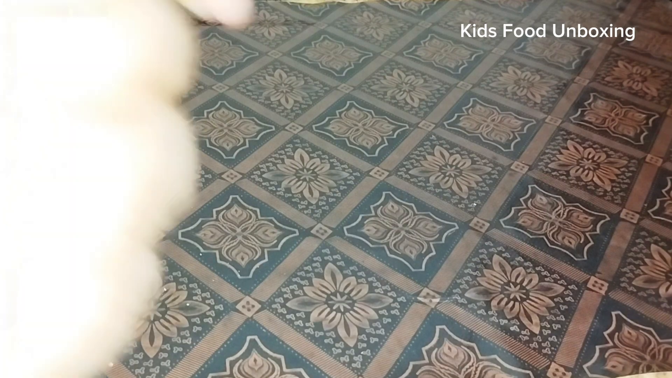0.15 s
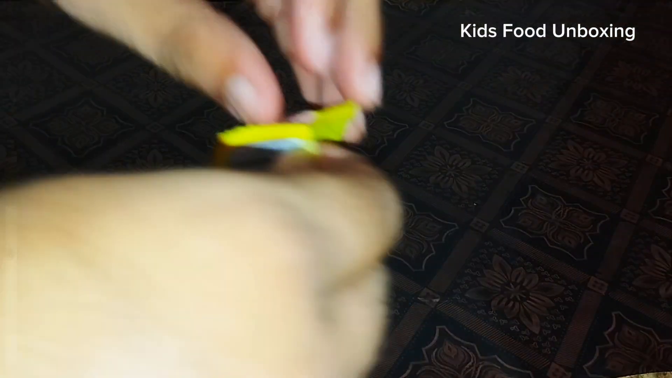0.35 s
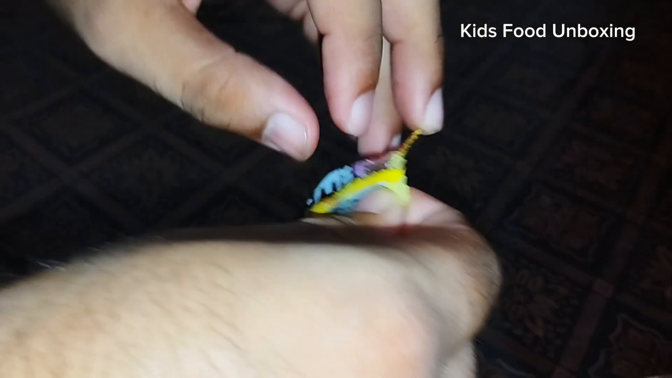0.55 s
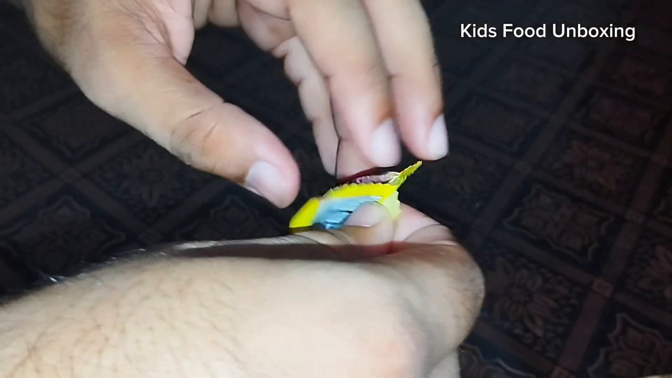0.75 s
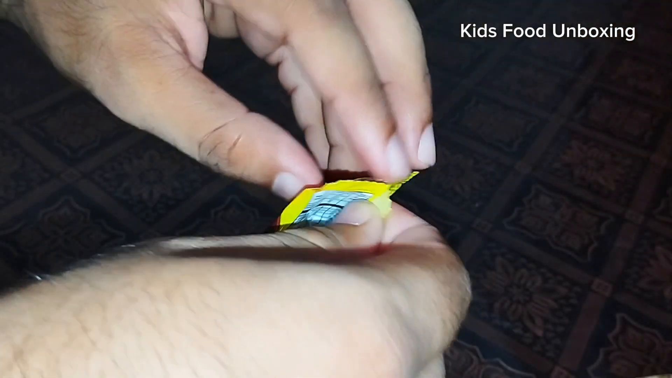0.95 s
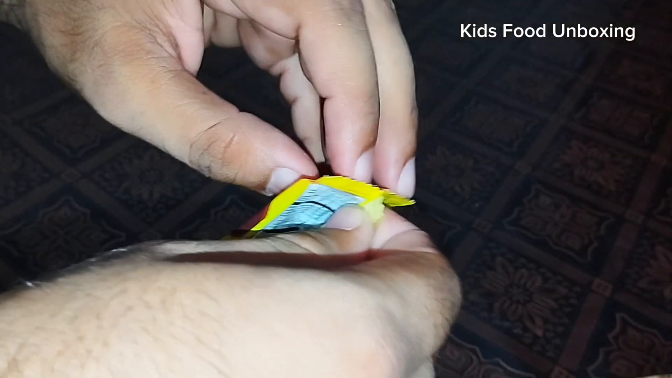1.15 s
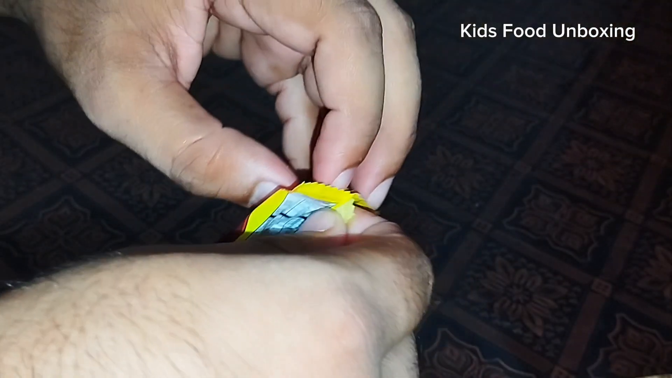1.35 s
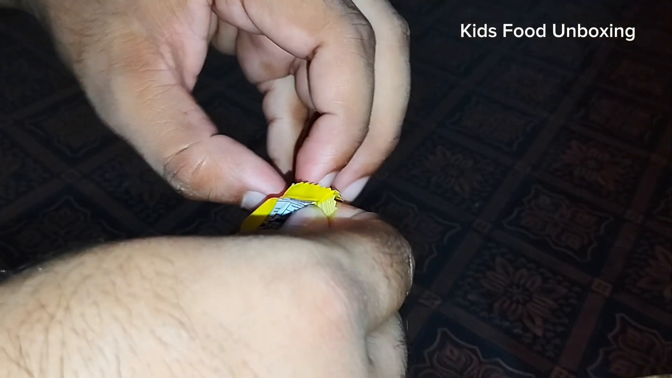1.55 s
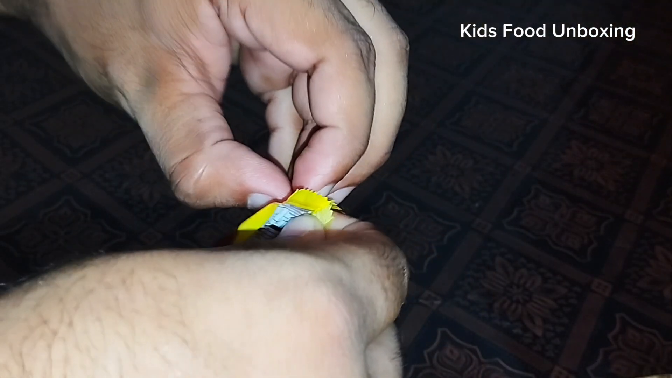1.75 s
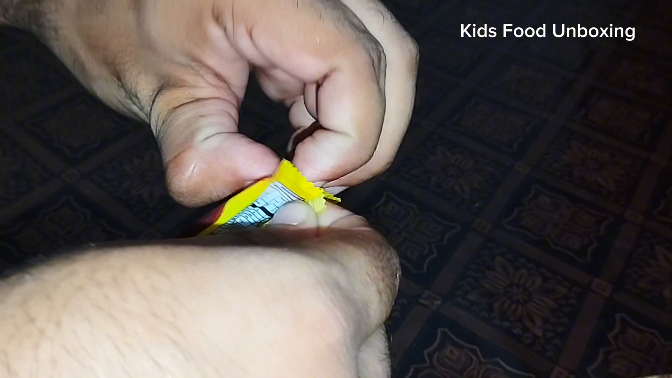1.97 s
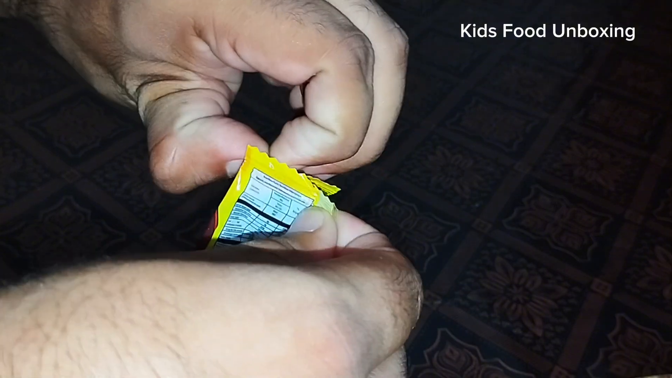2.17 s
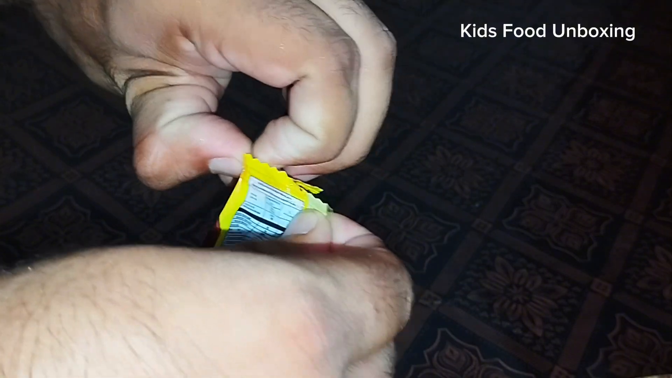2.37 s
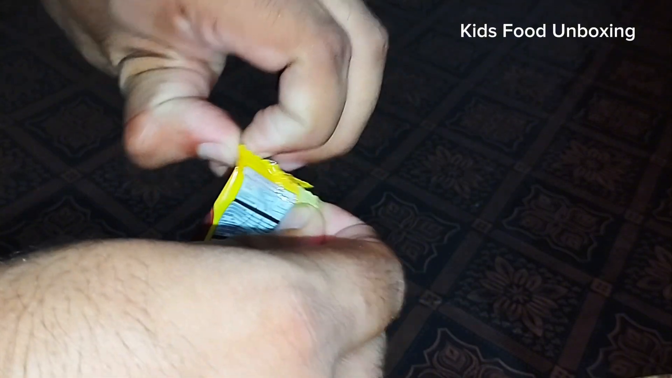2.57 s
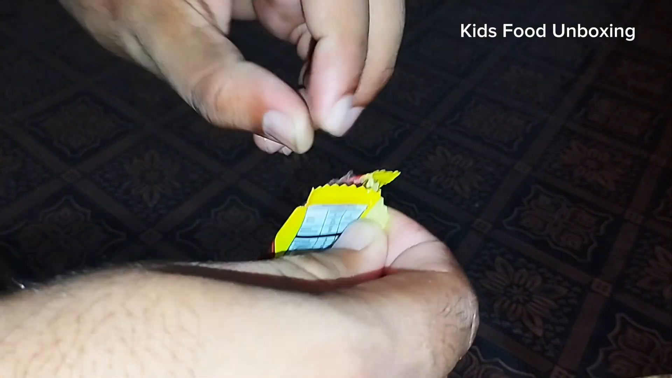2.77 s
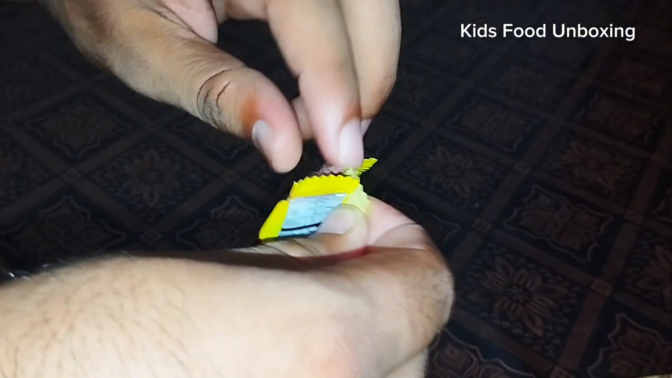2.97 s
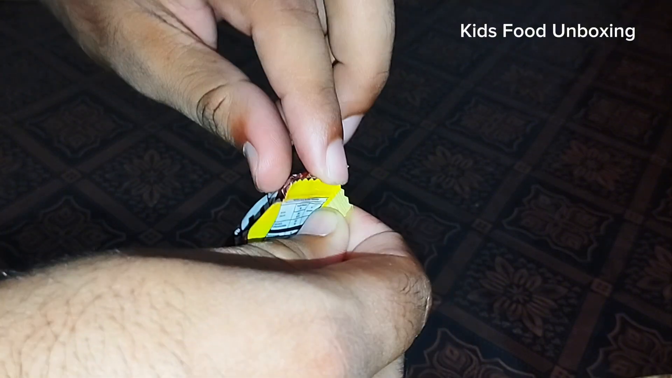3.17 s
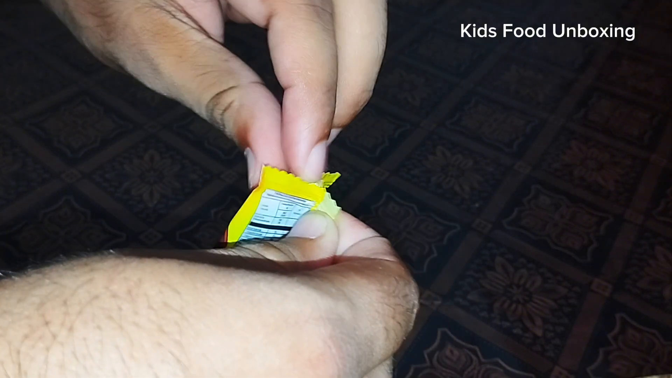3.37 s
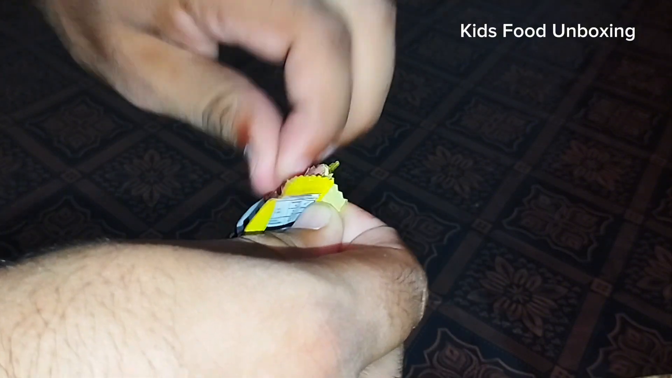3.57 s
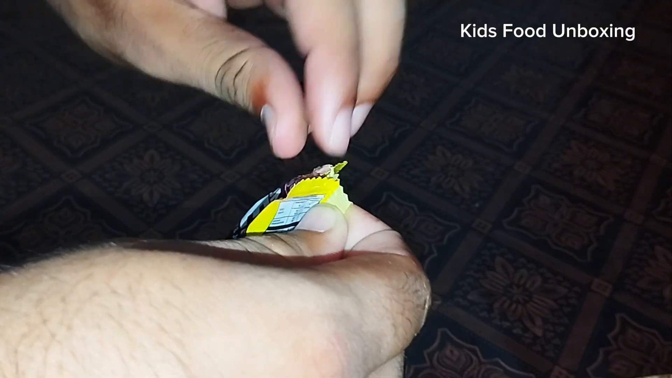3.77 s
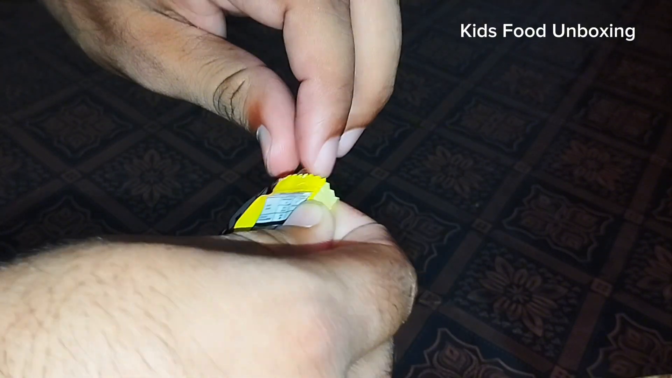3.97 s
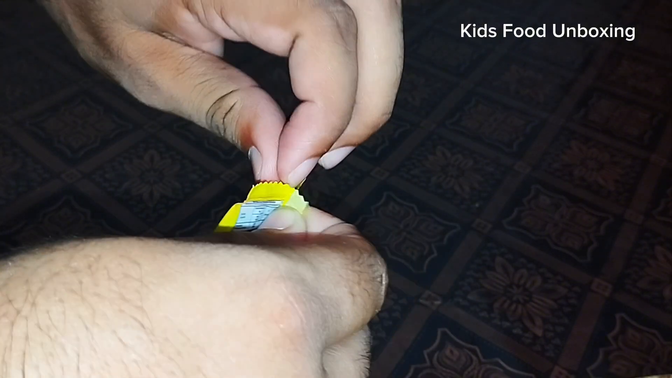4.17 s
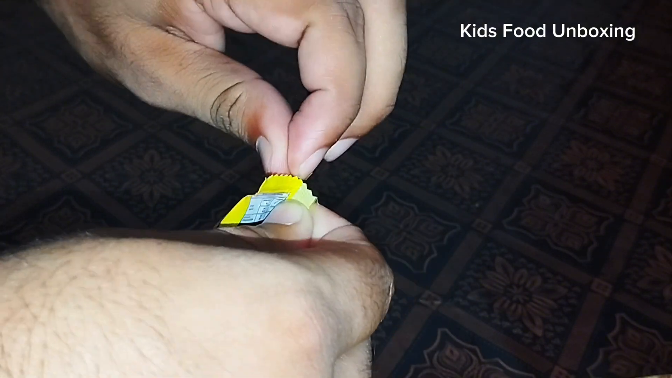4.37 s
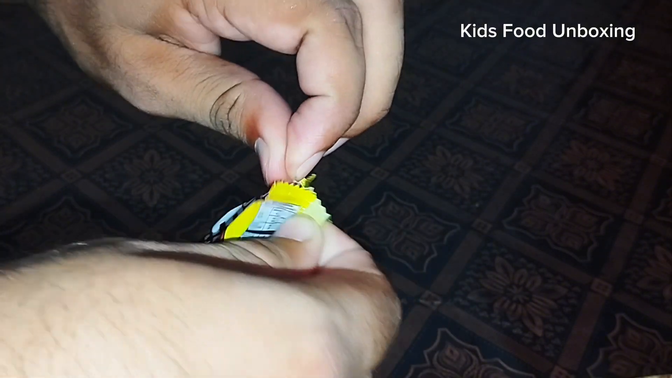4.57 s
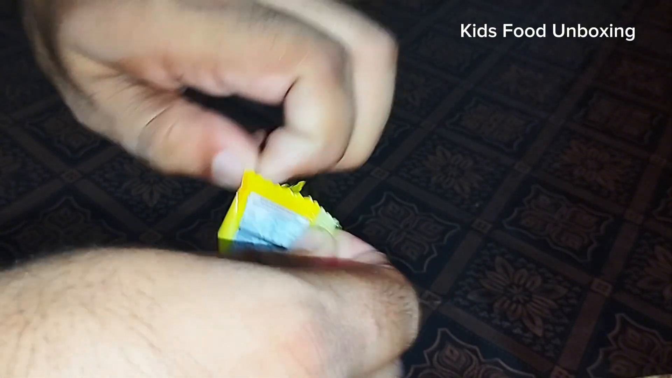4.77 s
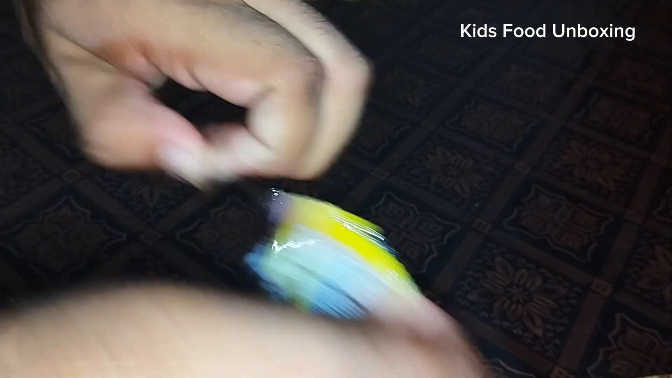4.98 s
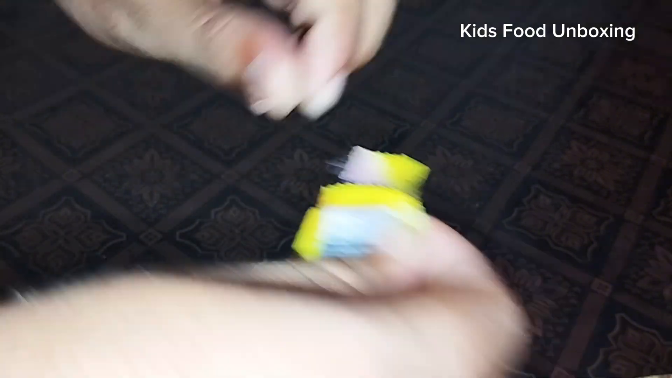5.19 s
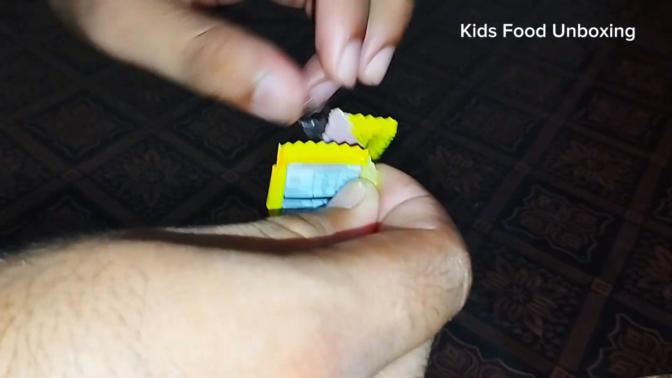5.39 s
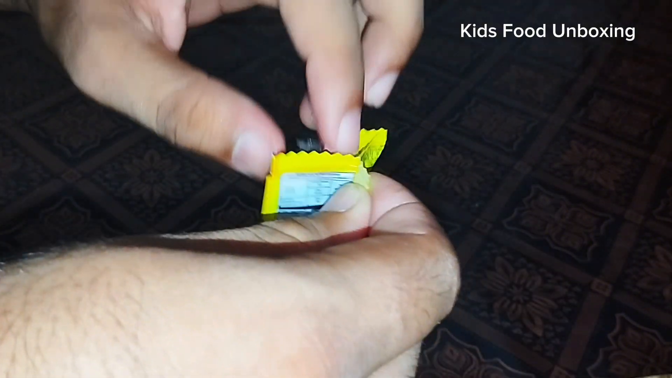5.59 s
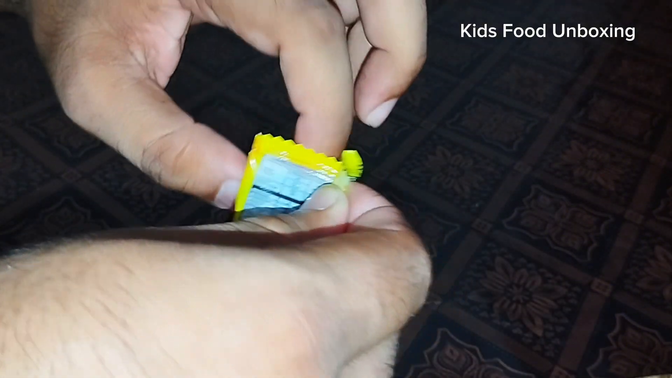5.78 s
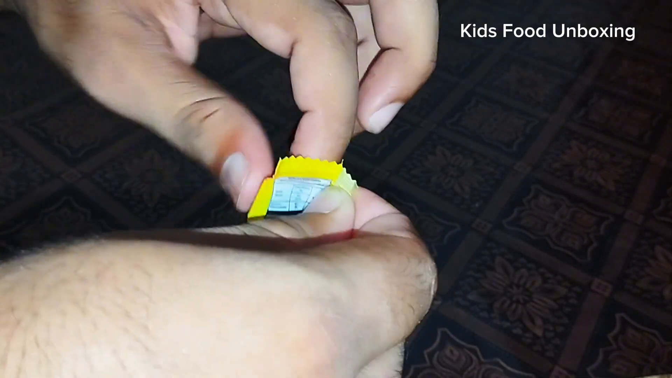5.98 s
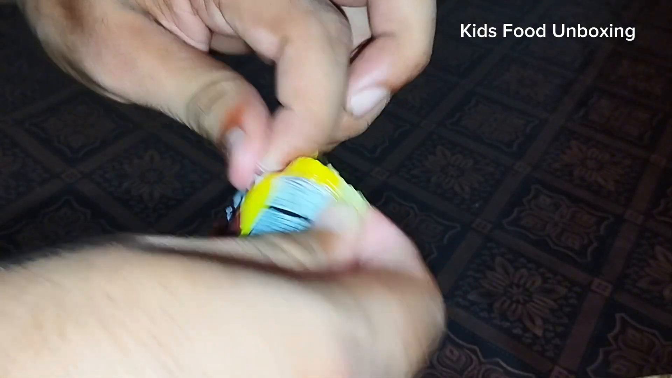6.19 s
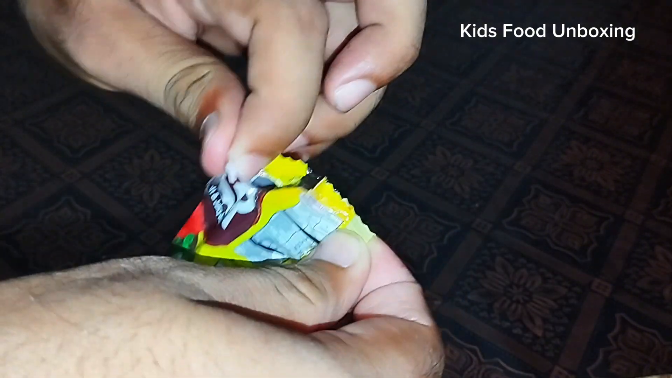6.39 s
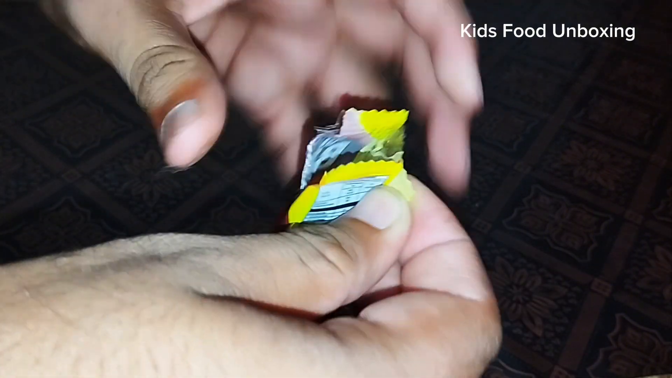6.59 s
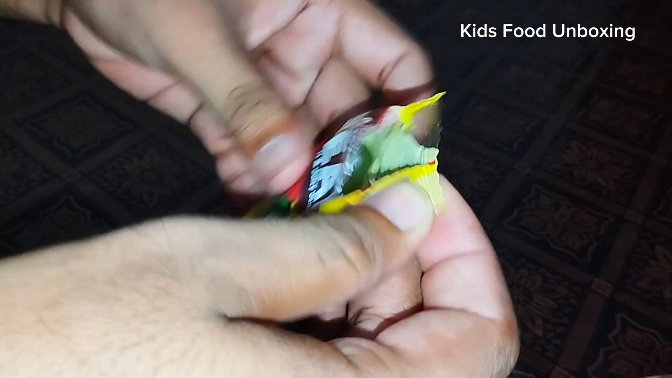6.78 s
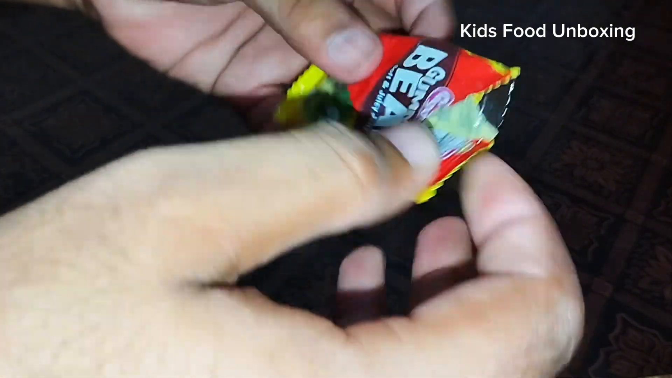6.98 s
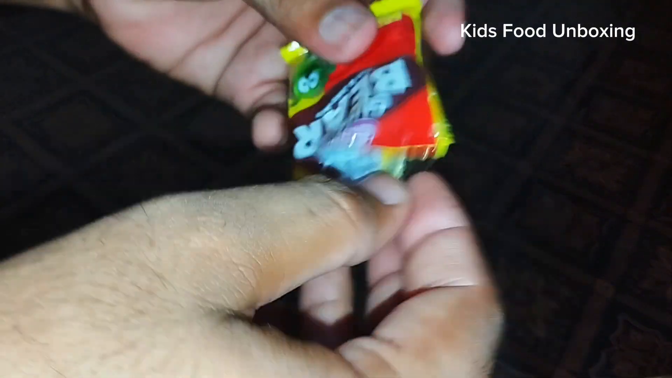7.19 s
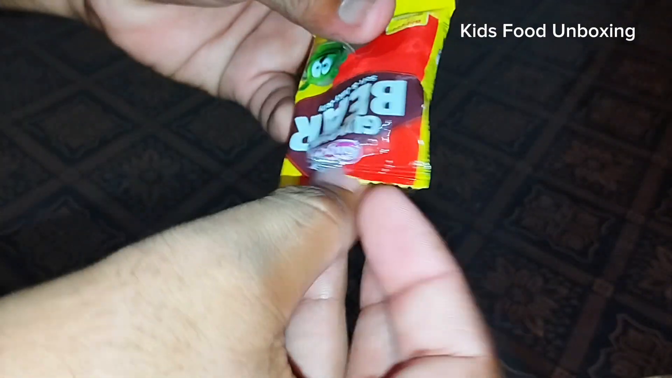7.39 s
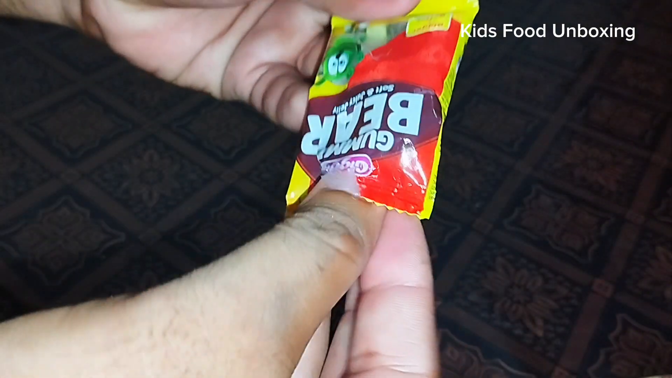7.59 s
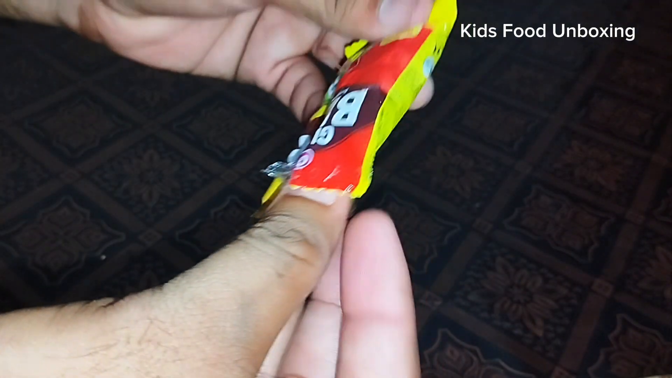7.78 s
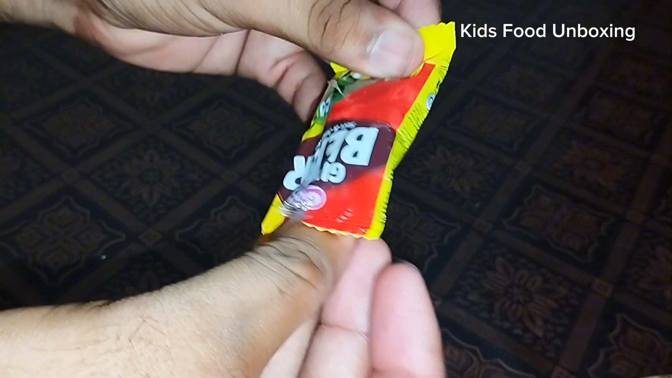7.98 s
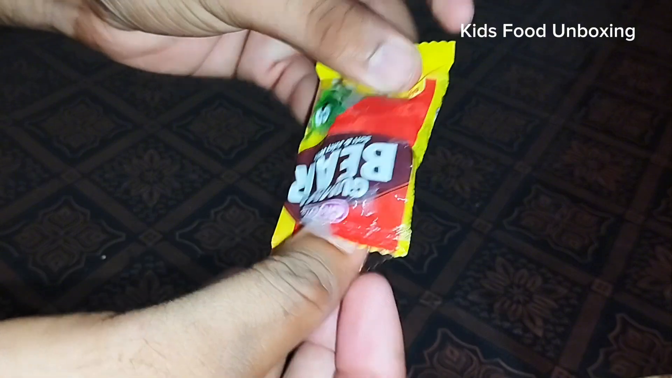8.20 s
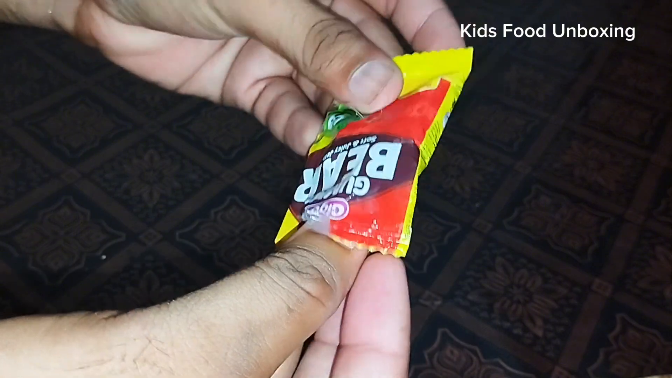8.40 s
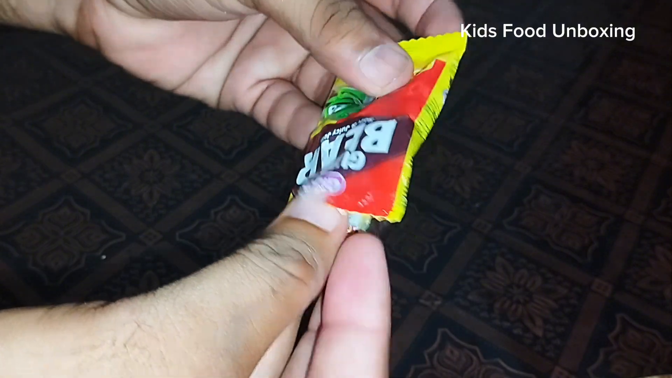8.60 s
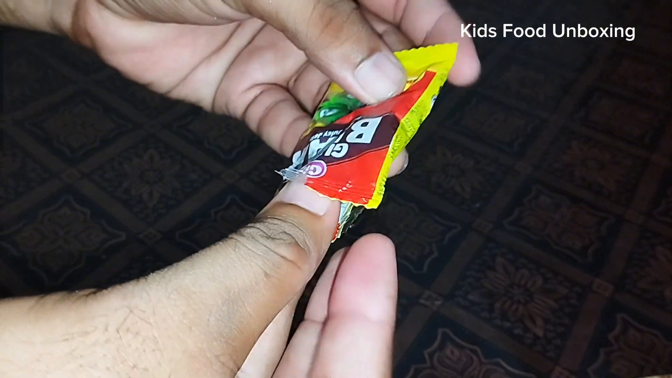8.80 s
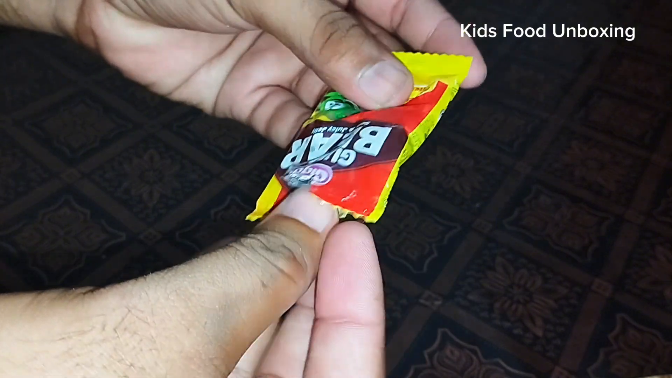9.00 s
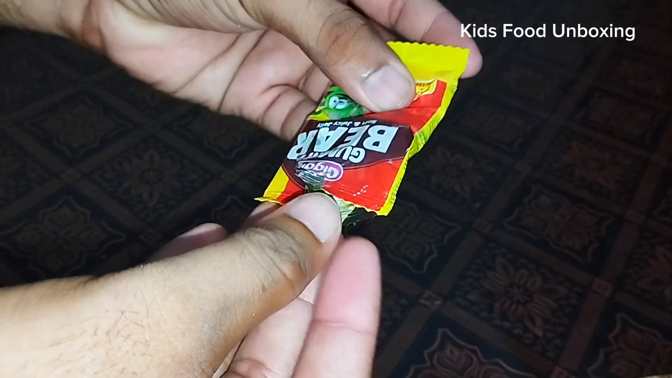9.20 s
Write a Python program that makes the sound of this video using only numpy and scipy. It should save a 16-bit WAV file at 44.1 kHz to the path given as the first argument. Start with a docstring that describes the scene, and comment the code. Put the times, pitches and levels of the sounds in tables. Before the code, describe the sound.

Close, bright crackling of a little plastic packet being pulled open in irregular bursts, with short room reflections and a deep fan-like hum beneath.

```python
"""Sharp snaps and fine crinkling, very close: fingers pick open a small plastic snack wrapper in a hard-walled room.
Creases in the stiff film buckle as filtered impulses with noisy tails; around them come clumps of tiny
ringing ticks, grainy fingertip slides, narrow-band tails and low, damped thuds.
Beneath lies room air, a low fan hum of wandering partials whose level varies, and a distant noise-modulated
drone that swells towards the end."""
import sys
import numpy as np
from scipy import signal
from scipy.fft import rfft, irfft
from scipy.io import wavfile

SR = 44100
rng = np.random.default_rng(int(sys.argv[2]) if len(sys.argv) > 2 else 0)


def store_wav(level_fs):
    """Save 16-bit WAV to argv[1]."""
    pcm = np.round(np.clip(np.atleast_2d(level_fs), -1, 1) * 32767)
    wavfile.write(sys.argv[1], SR, pcm.T.astype(np.int16))


N = 407925
TIME = np.arange(N) / SR


def from_db(db):
    """Decibels to an amplitude factor."""
    return 10 ** (np.asarray(db) / 20)


def rms_one(x):
    """Scale to an RMS of 1, over all channels together."""
    return x / np.sqrt(np.mean(x ** 2) + 1e-20)


def in_time(rows):
    """Each column of a time curve, at every sample."""
    s, *columns = np.transpose(rows)
    return [np.interp(TIME, s, column) for column in columns]


def at_hz(points, hz):
    """A table read on a log-frequency axis."""
    f, value = np.transpose(points)
    return np.interp(np.log(np.maximum(hz, 1)), np.log(f), value)


def resonance(hz, centre, q):
    """Complex response of one damped resonance, 1 at its centre."""
    s = 1j * hz / centre
    return s / q / (s * s + s / q + 1)


def colour(x, spectrum, size=8192):
    """Causal (minimum-phase) filter with the given spectrum."""
    gain = from_db(at_hz(spectrum, np.fft.rfftfreq(size, 1 / SR)))
    cepstrum = irfft(np.log(gain))
    # folding the cepstrum onto positive time makes the phase minimal
    cepstrum[1:size // 2] *= 2
    cepstrum[size // 2 + 1:] = 0
    impulse_response = irfft(np.exp(rfft(cepstrum)))
    return signal.oaconvolve(x, impulse_response[None], axes=1)[:, :N]


def drift(rate):
    """Smooth random wander of spread 1, changing about rate times a second."""
    knots = rng.standard_normal(4096)
    return np.interp(TIME * rate, np.arange(len(knots)), knots) * np.sqrt(3 / 2)


# spectral shape of the room air: (frequency [Hz], relative level per Hz [dB])
AIR_SPECTRUM = [(20, 3.5), (45, -2.5), (190, -8.5), (330, -13), (650, -25), (1500, -30), (5800, -35.5),
                (7100, -27.5), (8200, -41), (16000, -49)]


def air(level_db=-45.0, apart_hz=600, unlike_db=-13):
    """Room rumble and hiss: mostly alike at both ports in the bass, unrelated in the treble."""
    mid, side = rng.standard_normal((2, N))
    highpass = signal.butter(1, apart_hz, "high", fs=SR, output="sos")
    side = from_db(unlike_db) * side + signal.sosfilt(highpass, side)
    stereo = np.array([mid + side, mid - side])
    return from_db(level_db) * rms_one(colour(stereo, AIR_SPECTRUM))


# pitch and loudness of the far drone: (time [s], pitch [Hz], level [dB])
DRONE_CURVE = [(0, 101, -55), (6.0, 101.3, -60.5), (6.35, 121, -46.5), (7.1, 103.2, -48.5),
               (9.25, 102.1, -46.5)]


def drone(unsteady_per_s=28):
    """A far tone made unsteady by random modulation; it jumps up as it swells, then sinks in pitch."""
    pitch, level_db = in_time(DRONE_CURVE)
    tone = np.exp(2j * np.pi * np.cumsum(pitch) / SR)
    wander = drift(unsteady_per_s) + 1j * drift(unsteady_per_s)
    return from_db(level_db) * np.real(wander * tone)


# level of the low hum as heard, dipping briefly after the loud 5.07 s snap:
# (time [s], level before the hum trim [dB])
HUM_LEVEL = [(0.0, -38), (0.28, -33.5), (0.51, -57), (0.74, -30.5), (1.75, -37), (2.55, -33.5), (2.88, -41),
             (3.4, -30), (3.81, -50.5), (4.3, -30), (4.9, -42), (5.12, -64), (5.23, -39.5), (6.18, -45.5),
             (7.24, -37), (8.94, -44), (9.25, -32)]
# loudness of the hum's overtones: (time [s], third partial level [dB], fourth partial level [dB])
HUM_OVERTONES = [(0, -46.5, -45.5), (1.35, -46, -47), (2.3, -59, -64.5), (5.6, -51.5, -58),
                 (9.25, -62, -57)]


def fan(blade_hz=45.24, wobble_hz=0.183, hum_db=-5.0, fifth_db=-13,
        churning=0.19, overtone_churning=0.18, apart=0.11):
    """Blade-rate hum in churning air that differs a little at each port, with overtones of changing level."""
    low_db, = in_time(HUM_LEVEL)
    third_db, fourth_db = in_time(HUM_OVERTONES)
    phase = 2 * np.pi * np.cumsum(blade_hz + wobble_hz * drift(5.9)) / SR

    def partial(depth, order):
        """One multiple of the blade rate, its strength and phase stirred at random."""
        shared = depth * (drift(14) + 1j * drift(6.2))
        opposed = apart * (drift(14) + 1j * drift(14)) * np.array([[1], [-1]])
        tone = np.exp(1j * (order * phase + 2 * np.pi * rng.random()))
        return np.sqrt(2) * np.real((1 + shared + opposed) * tone)

    low_hum = from_db(low_db + hum_db) * partial(churning, order=1)
    third = from_db(third_db) * partial(overtone_churning, order=3)
    fourth = partial(overtone_churning, order=4)
    fifth = from_db(fifth_db) * partial(overtone_churning, order=5)
    return low_hum + third + from_db(fourth_db) * (fourth + fifth)


# how long the hard-walled room holds each band: (frequency [Hz], 60 dB decay time [s])
ROOM_DECAY = [(300, 0.38), (2000, 0.28), (6000, 0.3), (15000, 0.23)]


def room(x, build_s=0.034, first_s=0.0029, early_db=-3, early_s=0.0028, count=9):
    """An early burst off nearby surfaces, then a diffuse tail with its own decay in each band."""
    t = np.arange(int(.8 * SR)) / SR
    edges = np.geomspace(150, 18000, count + 1)
    white = rfft(rng.standard_normal((2, len(t))))
    hz = np.fft.rfftfreq(len(t), 1 / SR)
    tail = 0
    for low, high in zip(edges, edges[1:]):
        band = irfft(white * (hz >= low) * (hz < high), len(t))
        t60 = at_hz(ROOM_DECAY, np.sqrt(low * high))
        tail = tail + band * np.exp(-np.log(1000) * t / t60)
    diffuse = 1 - np.exp(-t / build_s)
    early = from_db(early_db) * np.exp(-t / early_s)
    tail = tail * (t > first_s) * (diffuse + early)
    return signal.oaconvolve(x, tail / np.linalg.norm(tail[0]), axes=1)[:, :N]


# low, dull bodies of the heavier snaps and a few soft thuds: (time [s], starting level [dB], pitch [Hz])
LOW_THUDS = [(1.522, -27, 1010), (2.155, -28.5, 405), (2.229, -22, 910), (2.709, -22.5, 393),
             (4.797, -22, 1100), (5.015, -21.5, 946), (5.622, -27.5, 253), (7.602, -21, 820)]


def thuds(decay_s=0.0045, pitch_spread=0.093):
    """Soft, heavily damped thuds, each the mean of three decaying sines at nearby pitches."""
    out, t = np.zeros(N), np.arange(SR // 10) / SR
    for s, level_db, pitch in LOW_THUDS:
        start = round(s * SR)
        pitches = pitch * np.exp(pitch_spread * np.array([-1, 0, 1]))
        modes = np.sin(2 * np.pi * np.outer(pitches, t))
        out[start:start + len(t)] += from_db(level_db) * modes.mean(axis=0) * np.exp(-t / decay_s)
    return out


# fingertips sliding on the film: (start time [s], length [s], level at mid-swell [dB])
FINGER_SLIDES = [(0.367, 0.16, -47.5), (4.384, 0.096, -48), (5.372, 0.14, -52)]


def slides(grain_per_s=900, grain_db=3.5, centre_hz=3500, centre_q=0.68, lowest_hz=1100):
    """Skin sticks and slips on the film in a short swell of grainy noise."""
    out, hz = np.zeros((2, N + SR)), np.fft.rfftfreq(SR, 1 / SR)
    bass_cut = hz / (hz - 1j * lowest_hz)
    for s, length, level_db in FINGER_SLIDES:
        size, start = int(length * SR), int(s * SR)
        grip = from_db(grain_db * drift(grain_per_s)[:SR])
        grainy = rfft(grip * rng.standard_normal((2, SR)))
        rub = irfft(grainy * resonance(hz, centre_hz, centre_q) * bass_cut)
        swell = np.sin(np.pi * np.arange(size) / size)
        out[:, start:start + size] += from_db(level_db) * rms_one(rub)[:, :size] * swell
    return out[:, :N]


# narrow-band tails lingering at a snap's pitch: (start time [s], starting level [dB], pitch [Hz])
PITCHED_TAILS = [(4.797, -30, 3830), (9.143, -43.5, 4130)]


def pitched_tails(decay_s=0.071, impulses_per_s=700):
    """Sparse random impulses through a resonance at the snap's pitch, dying away as the room holds it."""
    out, hz = np.zeros((2, N + SR)), np.fft.rfftfreq(SR, 1 / SR)
    for s, level_db, pitch in PITCHED_TAILS:
        impulses = (rng.random(SR) < impulses_per_s / SR) * rng.standard_normal((2, SR))
        band_q = (pitch / 2100) ** 2   # higher pitches ring clearer
        band = irfft(rfft(impulses) * resonance(hz, pitch, band_q) ** 2)
        start = round(s * SR)
        out[:, start:start + SR] += from_db(level_db) * rms_one(band) * np.exp(-TIME[:SR] / decay_s)
    return out[:, :N]


# separate pulls and pinches of the film: (start time [s], length [s], relative crinkle level at the start [dB])
FILM_STROKES = [(0, 0.15, -46.5), (1.383, 0.13, -46.5), (1.866, 0.07, -45), (2.141, 0.088, -36.5),
                (3.426, 0.23, -40), (4.57, 0.055, -41.5), (4.789, 0.2, -36), (4.999, 0.23, -42),
                (5.653, 0.74, -45.5), (6.234, 0.26, -42), (6.572, 0.044, -30.5), (6.84, 0.14, -42.5),
                (7.227, 0.3, -47.5), (7.593, 1, -40.5), (8.335, 0.44, -40), (8.911, 0.2, -47)]


def crinkle_level(attack_s=0.018, release_s=0.0092, ease_db_per_s=15,
                  tail_db=-48, tail_s=0.054, tail_follows=0.42):
    """Each stroke takes hold, eases and lets go; a faint crackling tail fades after every snap, like reverberation."""
    power = 0
    for start, length, level_db in FILM_STROKES:
        corners = [0, attack_s, attack_s + length, attack_s + length + release_s]
        grip = np.interp(TIME - start, corners, [0, 1, 1, 0])
        eased_db = level_db - ease_db_per_s * np.clip(TIME - start, 0, 1)   # the film yields
        power = power + (grip * from_db(eased_db)) ** 2
    s, snap_db = np.transpose(CREASE_SNAPS)[:2]
    # the tail grows by only a share of the snap's strength in dB
    start_power = from_db(tail_db + tail_follows * snap_db) ** 2
    tail_starts = np.bincount((np.abs(s) * SR).astype(int), start_power, N)
    tail_power = signal.lfilter([1], [1, -np.exp(-2 / (tail_s * SR))], tail_starts + 1e-18)
    return np.sqrt(power + tail_power)


# spectral shape of skin rubbing on the film: (frequency [Hz], relative level per Hz [dB])
RUB_SPECTRUM = [(200, -10), (900, 7.5), (2000, 0.5), (6500, -19.5), (16000, -1)]


def crinkle(per_s=340, clump_db=6.0, rub_db=-6, grain_q=2.35, size_db=6.5, level_db=0.5, count=12):
    """Tiny ringing ticks of many pitches come in clumps, denser when louder, over the soft rub of skin."""
    level = crinkle_level()
    rate = per_s * np.sqrt(level / level.mean()) * from_db(clump_db * drift(35))
    born = rng.random(N) < rate / SR
    sizes = from_db(np.minimum(size_db * rng.exponential(1, N), 18))
    clicks = born * sizes * rng.choice([-1, 1], N)
    dealt = rng.integers(0, count, N)   # which pitch each click gets
    fade = np.exp(-np.arange(128) / 24)   # in samples
    grains = 0
    for k, pitch in enumerate(np.geomspace(1800, 8500, count)):
        ring = rms_one(rng.standard_normal((2, len(fade))) * fade)
        ticks = signal.oaconvolve((clicks * (dealt == k))[None], ring, axes=1)[:, :N]
        b, a = signal.iirpeak(pitch, grain_q, fs=SR)
        grains = grains + signal.lfilter(b, a, ticks + 1e-18)
    rub = rms_one(colour(rng.standard_normal((2, N)), RUB_SPECTRUM))
    return (rms_one(grains) + from_db(rub_db) * rub) * level * from_db(level_db)


# creases buckling: (time [s], relative energy [dB], crease pitch [Hz])
CREASE_SNAPS = [(0.009, 9, 7500), (0.039, -4.5, 6350), (0.104, -8.5, 6170), (0.1126, 4, 5300),
                (0.5276, -10, 7000), (0.9, -10, 4900), (0.93, -14.5, 4900), (1.041, -11, 5540),
                (1.049, -7, 5760), (1.185, -10.5, 3450), (1.407, -2, 3550), (1.519, -0.5, 5500),
                (1.539, -2, 5200), (1.5835, 4, 5600), (1.633, 2.5, 5250), (1.708, -10.5, 3850),
                (1.7469, -6.5, 6300), (1.83, -12.5, 5430), (1.919, -0.5, 3440), (2.0133, -5, 5740),
                (2.026, -9.5, 5100), (2.091, -5, 5500), (2.1196, 5.5, 5340), (2.1561, 11.5, 6000),
                (2.1867, 6, 5030), (2.196, 2, 5600), (2.221, -11, 6550), (2.2302, 1.5, 3600),
                (2.347, 1, 3440), (2.381, -4.5, 6400), (2.528, -9.5, 3270), (2.5563, -5, 3320),
                (2.6711, 5.5, 5600), (2.678, 3.5, 4000), (2.707, 4, 4140), (2.712, 9, 6450),
                (2.955, -19, 3780), (3.112, -26, 2980), (3.3754, -11, 3550), (3.4211, 1, 7200),
                (3.4325, -6.5, 6040), (3.447, 2, 5740), (3.455, 4, 5750), (3.472, 3.5, 6960),
                (3.5511, 3.5, 5550), (3.5695, 3.5, 4900), (3.5992, -4, 4000), (4.156, -20, 5500),
                (4.19, -24, 4000), (4.261, -16.5, 3680), (4.29, -26, 4000), (4.474, -12.5, 5300),
                (4.51, -12.5, 5950), (4.5737, 2.5, 5130), (4.59, 5, 3530), (4.728, -9, 5800),
                (4.7462, 1.5, 5450), (4.796, 7.5, 4870), (4.816, 0, 4050), (4.826, 5, 7040),
                (4.8444, 5.5, 6100), (4.8672, -5, 6300), (4.8767, 4.5, 6370), (4.927, 1, 2940),
                (4.9425, 3.5, 4830), (4.9497, -4, 2580), (4.973, -7, 3940), (5.0165, -6, 3880),
                (5.0681, 8.5, 3640), (5.1914, 6, 6200), (5.691, -2, 6200), (5.715, -2.5, 5030),
                (5.743, -0.5, 4700), (5.8088, 3, 6900), (5.977, 5.5, 5170), (5.996, -13.5, 2750),
                (6.1073, 2.5, 6340), (6.1896, -0.5, 5000), (6.27, -1.5, 3150), (6.2835, 4, 5700),
                (6.292, 4, 5040), (6.306, 2.5, 3100), (6.3151, -2, 2200), (6.4251, 7.5, 3680),
                (6.439, 0, 3170), (6.546, -15, 1900), (6.592, 0, 2000), (6.5987, -2.5, 3430),
                (6.6078, 0, 6440), (6.613, -7, 3400), (6.6242, 5.5, 3500), (6.6295, 8.5, 7200),
                (6.861, -2, 2400), (6.8693, 3.5, 3730), (6.892, -1, 6060), (6.964, -5, 3660),
                (7.265, -3, 4700), (7.3513, 3.5, 3600), (7.564, -14.5, 5400), (7.583, 2.5, 4970),
                (7.6131, 2.5, 4220), (7.624, -12, 4600), (7.6568, -1.5, 3270), (7.692, -13, 6000),
                (7.735, -1.5, 3200), (7.797, 0, 7250), (7.8404, 4.5, 3950), (7.845, 3.5, 5300),
                (7.852, 0, 4600), (7.952, 0, 4800), (8.051, -4, 5470), (8.067, -11, 5500),
                (8.0935, 0.5, 4940), (8.1008, 4.5, 3680), (8.211, 2, 6300), (8.3005, 3, 5230),
                (8.3602, -10, 4950), (8.3725, 0.5, 3440), (8.4436, 4, 3960), (8.448, -0.5, 4020),
                (8.4632, -9, 3900), (8.5, -20, 3670), (8.5306, -10, 3770), (8.5863, 5, 8100),
                (8.738, -3.5, 3800), (8.781, -13.5, 1840), (8.798, -11.5, 1860), (8.9826, -2.5, 4070),
                (9.0548, -3.5, 6300), (9.112, -16, 4440), (9.1425, -3, 3740)]


def snaps(ring_s=0.0021, rustle_db=-16, slips_per_s=600, slip_s=0.0011, slip_db=-7,
          rise_s=0.00061, rise_db=-15, crease_q=0.4, facet_q=3.8, facet_db=-3,
          flap_hz=960, flap_q=0.59, flap_db=-13, flap_db_per_octave=10, flap_scatter_db=3.5,
          middle_crease_hz=4500, edge_db=-8, lag_s=0.00021, left_db=1.5, sway_db=3, size=1024):
    """A short noisy rise, one click as the crease flips, small slips; its facet rings and its panel flaps lower."""
    lead = size // 5   # samples before the main click
    out, hz = np.zeros((2, N + size)), np.fft.rfftfreq(size, 1 / SR)
    t = (np.arange(size) - lead) / SR
    away = np.abs(t)
    rising = from_db(rise_db) * np.exp(-away / rise_s)
    rustling = from_db(rustle_db) * np.exp(-away / ring_s)
    noise_level = np.where(t < 0, rising, rustling)
    slip_level = from_db(slip_db) * np.exp(-away / np.where(t < 0, rise_s, slip_s))
    small = (hz / (hz - 1j * flap_hz / 2)) ** 2   # a crease is too small to radiate bass
    for s, level_db, pitch in CREASE_SNAPS:
        # a longer, lower crease sets more of its panel flapping
        octaves_below = np.log2(middle_crease_hz / pitch)
        this_flap_db = flap_db + flap_db_per_octave * octaves_below + flap_scatter_db * rng.standard_normal()
        noise = rng.standard_normal((3, size))
        slips = (rng.random(size) < slips_per_s / SR) * slip_level
        flip = (t == 0) * rng.choice([-1, 1])
        # the crumpled film radiates differently to each side
        around = (noise[:2] + noise[2]) / np.sqrt(2) * (noise_level + slips)
        # the left port is nearer
        lag = np.exp(-2j * np.pi * np.outer([0, lag_s * rng.random()], hz))
        push = rfft(flip + around) * lag
        crease = irfft(push * resonance(hz, pitch, crease_q) * small)
        facet = irfft(push * resonance(hz, pitch, facet_q) * small)
        panel_hz = flap_hz * from_db(rng.normal(0, 8.7))
        flap = irfft(push * resonance(hz, panel_hz, flap_q) * resonance(hz, flap_hz, flap_q))
        # the highest treble is gone with the flip itself
        edge = irfft(rfft(flip) * lag * resonance(hz, 15300, 1) * small)
        snap = 0
        for part, part_db in ((crease, 0), (facet, facet_db), (flap, this_flap_db), (edge, edge_db)):
            snap = snap + from_db(part_db) * part / np.linalg.norm(part, axis=1, keepdims=True)
        snap = rms_one(snap) / np.sqrt(size)
        pan_db = left_db + sway_db * rng.standard_normal()
        sides_db = level_db + np.array([[pan_db], [-pan_db]]) / 2
        start = max(round(s * SR) - lead, 0)
        out[:, start:start + size] += snap * from_db(sides_db)
    return out[:, :N]


def scene(snap_db=1.5, room_db=-13.0):
    """The wrapper in the room, over the hum."""
    wrapper = from_db(snap_db) * snaps() + crinkle() + pitched_tails() + slides() + thuds()
    # as the hands move, the pattern of reflections changes
    place = np.pi * drift(2)
    echoes = room(wrapper * np.cos(place)) + room(wrapper * np.sin(place))
    return wrapper + from_db(room_db) * echoes + fan() + drone() + air()


# response of the microphone port: (frequency [Hz], gain [dB])
PORT_RESPONSE = [(3400, 1), (3700, 1.5), (3950, -0.5), (6800, 0), (8200, -5.5), (9200, -13.5),
                 (9900, -26.5), (11200, -9), (12300, -19), (13500, -18), (14800, -27), (15700, -3),
                 (16400, -38)]


def record(dry, cutoff_hz=16700):
    """The port lifts the upper mids slightly and notches the treble; peaks clip and the top is cut."""
    heard = np.clip(colour(dry, PORT_RESPONSE), -.9, .9)
    lowpass = signal.ellip(10, .1, 100, cutoff_hz, fs=SR, output="sos")
    return signal.sosfilt(lowpass, heard)


dry = scene()
out = record(dry)
store_wav(out)
```